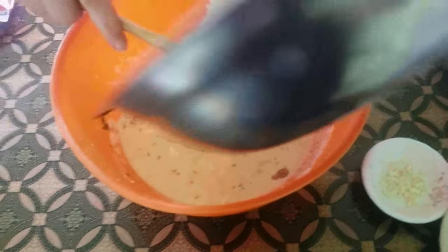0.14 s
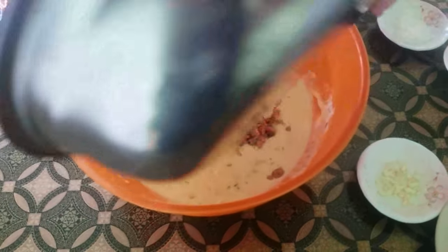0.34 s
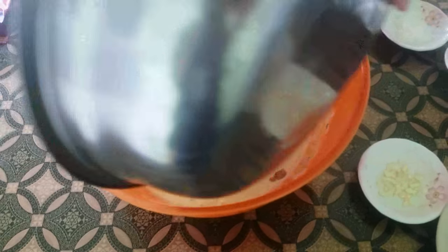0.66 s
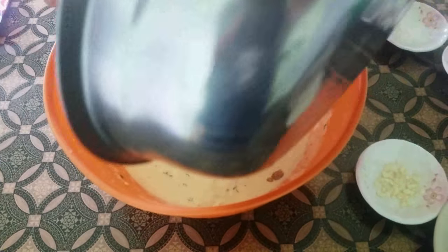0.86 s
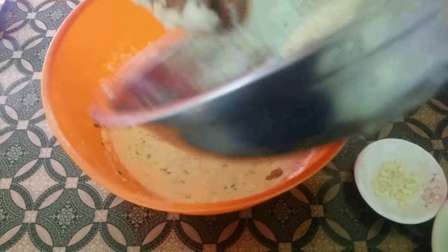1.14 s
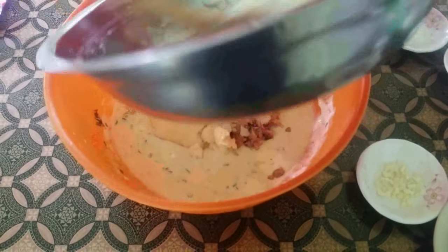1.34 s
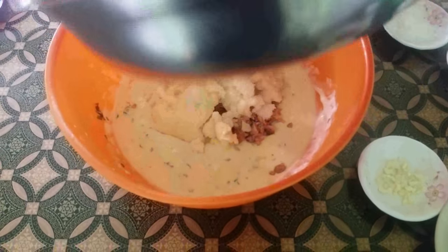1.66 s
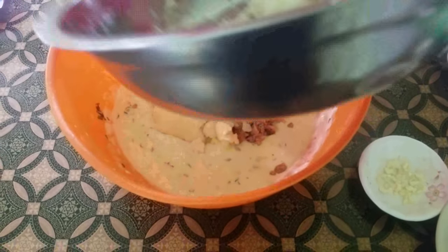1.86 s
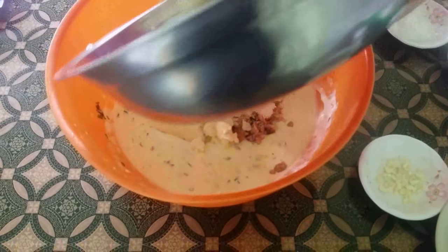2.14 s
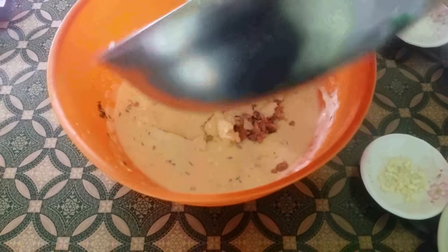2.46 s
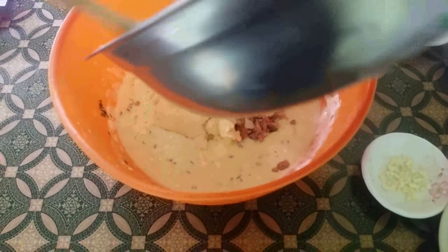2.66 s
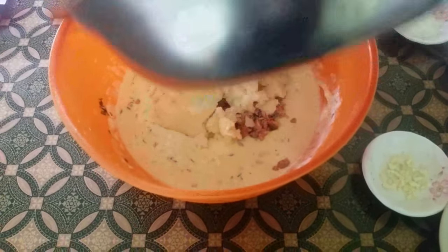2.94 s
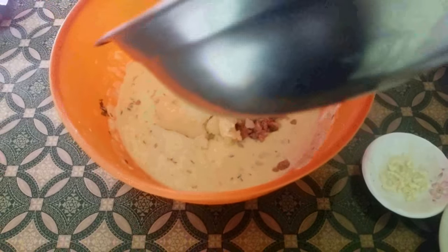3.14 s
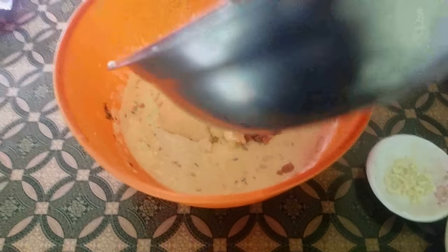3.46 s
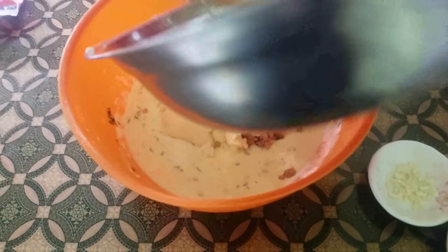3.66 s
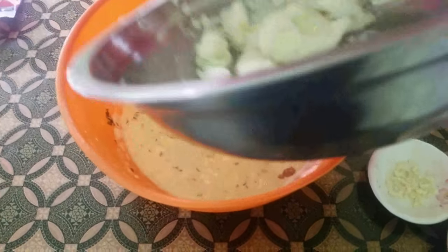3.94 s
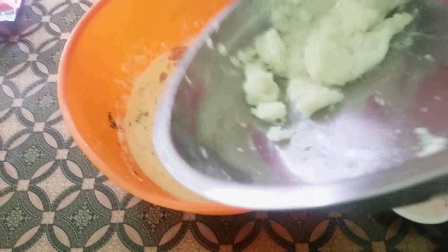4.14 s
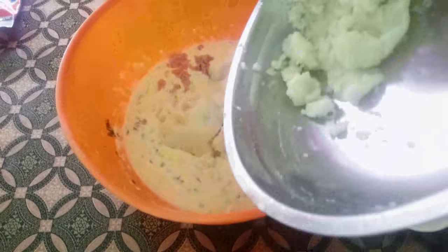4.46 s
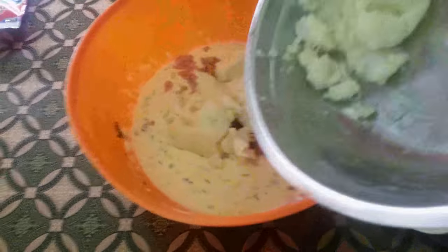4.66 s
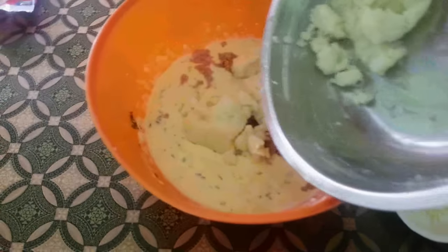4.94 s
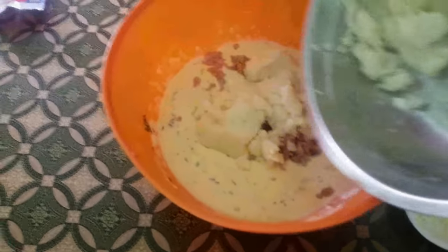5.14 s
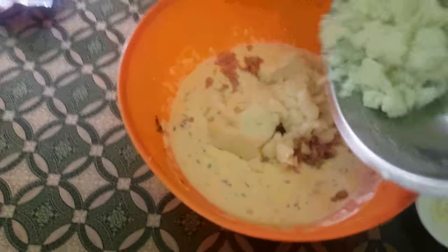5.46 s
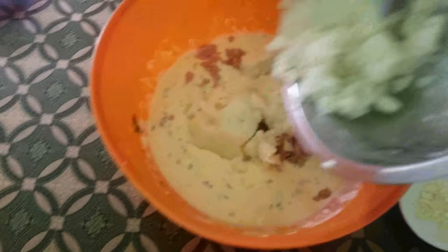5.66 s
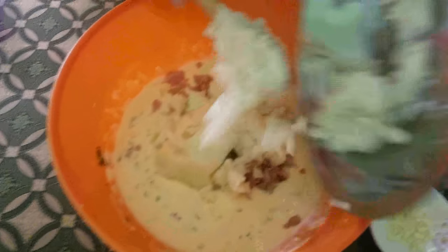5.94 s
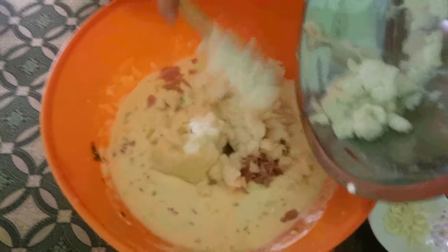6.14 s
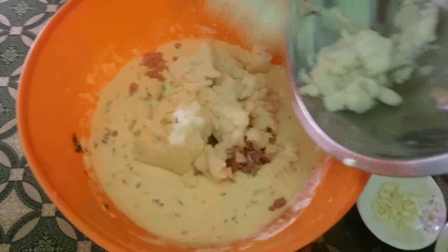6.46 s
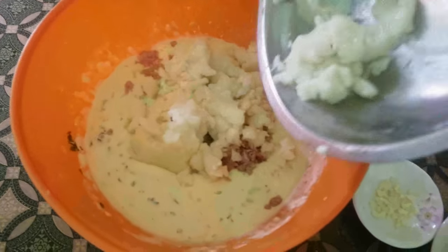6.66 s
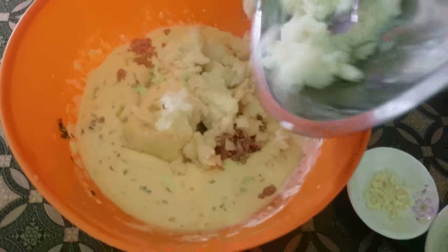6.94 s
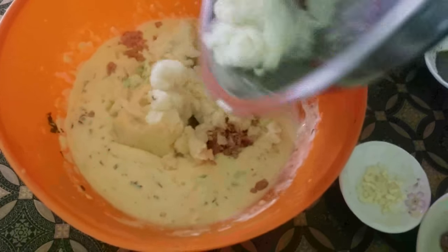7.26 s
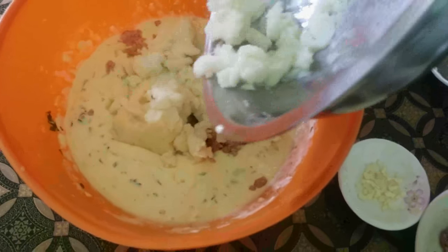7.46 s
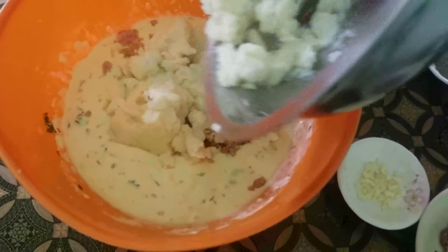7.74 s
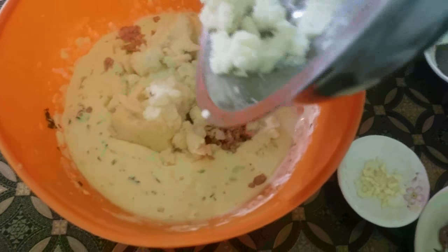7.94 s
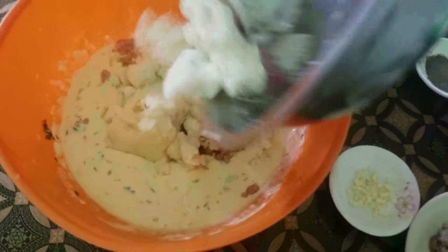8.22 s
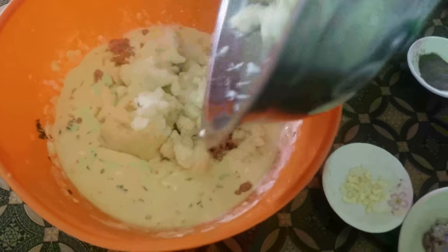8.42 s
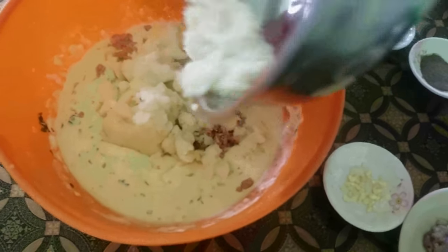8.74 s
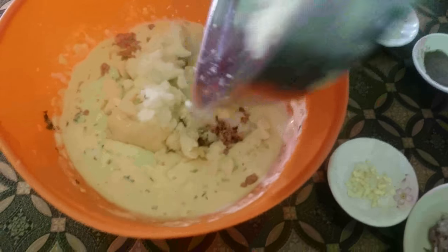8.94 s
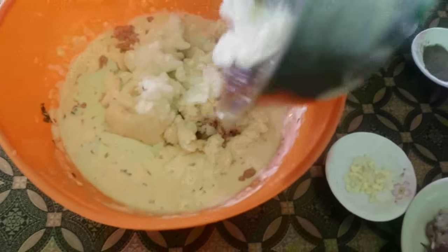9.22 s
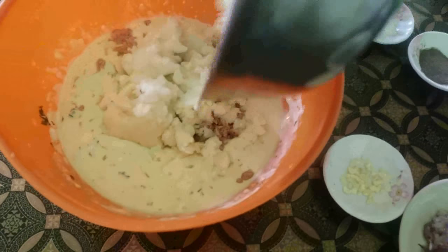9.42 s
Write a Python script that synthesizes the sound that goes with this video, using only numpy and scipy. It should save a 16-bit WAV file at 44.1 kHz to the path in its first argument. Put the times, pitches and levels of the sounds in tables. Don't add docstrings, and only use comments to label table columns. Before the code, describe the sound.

In a hard-walled kitchen, a low steady refrigerator hum, soft street rumble and hiss lie under a faint, distant clock ticking once a second. Close up, light wooden rubbing and moist food hiss begin. A moderate dull knock on a damped steel pan comes at 0.7 s, then louder ones at 1.4 and 1.7, a softer crackly one at 2.6. Brief scrapes and a bright skate run around 2.7-2.8, and a lump thuds softly into a plastic bowl at 3.1. A strong knock with a small rattle lands at 3.4, scraping and sticky flecks at 3.75, another firm knock at 4.05. From 4.4 to 6.5 there is mostly quiet smearing, tiny ticks and a soft thump at 5.2. Loud knocks ring at 6.7 and, loudest, 7.1, each with short room echo. A medium knock at 8.0, faint touches at 8.5 and 9.2, then hum and hiss.

```python
import sys
import numpy as np
from scipy import signal
from scipy.io import wavfile
from scipy.ndimage import uniform_filter1d

SR = 44100
rng = np.random.default_rng(int(sys.argv[2]) if len(sys.argv) > 2 else 0)


def nominal_scale(level):
    x = np.asarray(level, float) / 20
    return 10 ** x


def generate_wav(signal):
    frames = np.transpose(np.atleast_2d(signal))
    scaled = np.clip(frames, -1, 1) * 32767
    pcm = np.round(scaled).astype(np.int16)
    wavfile.write(sys.argv[1], SR, pcm)


N = 422756
TIME = np.arange(N) / SR

# pitch_hz [Hz], level_db [dB], t60_s [s]
BASE_FULL = [(163, -25, 0.058), (303, -3, 0.031), (345, -6.5, 0.083), (660, 10, 0.02), (763, 1.5, 0.027),
             (900, -6, 0.022), (1024, -9.5, 0.024), (1350, 7, 0.015), (1425, -5.5, 0.12),
             (483, -14.5, 0.13), (638, -17, 0.12), (2260, -40, .015)]
BASE_EDGE = [(277, -1.5, 0.014), (317, -0.5, 0.06), (344.3, -4, 0.15), (2500, -30, .06),
             (1020, -6.5, 0.026), (465, -7, 0.084), (650, 8, 0.035), (980, -9.5, 0.055), (1274, -1, 0.024),
             (2500, -20, 0.02)]
SIDE_LOW = [(231, -15, 0.052), (463, 6, 0.015), (620, 9.5, 0.026), (1005, -10, 0.059), (1300, -7, 0.058),
            (1420, -5.5, 0.09), (457.5, -9.5, 0.1), (704, -14.5, 0.19), (1930, -30, .012),
            (2240, -8, 0.026), (2660, -7, 0.019)]
SIDE_MIDDLE = [(228, 5, 0.02), (315, -4, 0.037), (430, 7, 0.014), (796, 6, 0.023), (1350, 7.5, 0.016),
               (815, -17.5, 0.22), (850, -18.5, 0.25), (1340, -12, 0.1), (461, -19.5, 0.17),
               (990, -13, .02), (1750, -14, 0.0071), (2100, -3, 0.012), (2530, -19, 0.018),
               (3000, -16, .006)]
SIDE_HIGH = [(239, -4, 0.11), (353, -10.5, 0.067), (415, -4, 0.031), (539, 7, 0.046), (549, -10, 0.38),
             (828, -12.5, 0.27), (1407, -13, 0.18), (1241, -14, 0.26), (691, -12.5, 0.24), (660, 5, 0.066),
             (770, 3, 0.12), (1250, 4, 0.03), (1310, 4.5, 0.025), (1770, -23, 0.013), (2400, -17, 0.013)]
NEAR_HAND = [(146, 6.5, 0.03), (338, 7, 0.017), (507, -5, 0.053), (715, -3.5, 0.035), (1350, 2.5, 0.017),
             (2500, -6, 0.022)]
UNDER_FOOD = [(117, 2.5, 0.029), (433, -5.5, 0.025), (746, 6.5, 0.011), (967, -4.5, 0.03),
              (1296, -4, 0.084), (1434, -2.5, 0.078)]
LIP = [(543, 17, 0.017), (816, 4.5, 0.019), (1266, -0.5, 0.041), (1550, -6, 0.063), (2510, 7, 0.011)]
BELOW_LIP = [(299, 7, 0.038), (600, 4.5, 0.033), (800, -9, 0.017), (1400, -1, 0.077), (1740, 0, 0.045),
             (2550, -14, 0.038), (3150, -18, .015)]
SPOTS = [BASE_FULL, BASE_EDGE, SIDE_LOW, SIDE_MIDDLE, SIDE_HIGH, NEAR_HAND, UNDER_FOOD, LIP, BELOW_LIP]
# echo_db [dB], hiss_db [dB]
SPOT_FEEL = [(-1.5, -6.5), (-1.1, 3), (0.5, -3), (1, -1.5), (-1.5, 0.5), (2.5, -.1), (1.7, 1), (-0.3, 7),
             (2.6, 8)]
# start_s [s], peak_db [dB], left_right_db [dB], crack_db [dB]
KNOCKS = [(0.738, -24.5, 5, -13.5), (1.362, -9.5, 3.5, -14.5), (1.707, -10, 2.5, -13.5),
          (2.097, -43.5, 5, -23), (2.616, -21.5, 5, -4), (3.426, -7.5, 2.5, -15), (3.478, -22.5, 3, -34),
          (3.487, -21, -4, -32), (3.509, -21, 1, -31), (3.528, -34, -2, -22), (3.733, -32, 0, -10),
          (3.78, -24.5, 1, -9.5), (3.811, -29.5, 3, -27), (3.919, -44, 0.0, -19), (4.055, -8.5, 6, -17.5),
          (4.596, -51.5, 5, 11.5), (4.984, -39.5, 6, 1), (5.008, -39, 3.5, -4), (6.742, -8, 4, -9),
          (7.129, -4.5, 4.5, -8.5), (7.136, -9.5, 0, -13), (7.966, -20, 9, -18), (8.017, -37, 1.5, -20),
          (8.137, -45, 10, -20), (8.529, -39, 12, -27), (9.216, -42.5, 11, -26)]
SPOT_OF_KNOCK = [6, 0, 0, 7, 8, 1, 1, 1, 1, 1, 2, 7, 7, 0, 2, 7, 7, 7, 3, 4, 4, 5, 4, 4, 5, 2]
PUSHED_OUTWARD = [1, 2, 4, 5]
# start_s [s], peak_db [dB], pitch_hz [Hz], t60_s [s]
DABS = [(.135, -46, 630, 0.035), (.2, -43, 620, 0.047), (.25, -44, 600, 0.046), (2.469, -41, 3150, .03),
        (.92, -45, 343, 0.066), (3.475, -20.5, 331, .1), (3.509, -25, 309.6, 0.12), (3.495, -22, 475, .06),
        (8.137, -38, 503, .04), (9.215, -39, 323, .12), (3.918, -49, 613, 0.036), (2.697, -38, 1270, .04),
        (2.713, -51, 2400, .05), (2.736, -34, 770, .04), (2.748, -35, 650, .05), (2.75, -48, 1400, 0.081),
        (2.748, -38, 2400, .02), (2.781, -34.5, 1303, 0.073), (2.8, -37, 2030, 0.033),
        (2.825, -39, 620, 0.072), (3.068, -53, 1420, .07), (3.125, -50, 1350, .05), (3.138, -51, 1260, .04),
        (3.152, -42.5, 560, 0.056), (3.155, -46, 840, .04), (3.187, -45, 606, 0.043),
        (3.178, -53, 1800, .03), (3.738, -30.5, 300, .05), (3.75, -39, 1296, .03), (3.75, -45, 2010, .03),
        (3.79, -49, 3270, .03), (3.82, -33, 295, .07), (3.842, -43, 280, 0.038), (4.598, -39, 1180, 0.032),
        (4.598, -40, 850, 0.028), (4.641, -44, 1000, .02), (4.984, -42.5, 1550, 0.039),
        (5.008, -38, 700, .03), (8.005, -48, 800, .07), (8.16, -46, 560, 0.14), (8.5, -52, 1350, .05),
        (9.172, -54, 2550, 0.042), (9.186, -46, 1190, 0.046), (9.193, -42, 427, .05),
        (9.2, -42, 773, 0.073), (9.204, -48, 2570, .06), (9.251, -42, 465, 0.1), (9.282, -46, 477, .08)]
# start_s [s], peak_db [dB]
TAPS = [
    (1.932, -55),
    (2.217, -63),
    (5.9858, -59),
    (6.162, -57.5),
]
# pitch_hz [Hz], level_db [dB], t60_s [s]
RIM_MODES = [(2520, 3, 0.028), (3150, 2, 0.0087)]
# start_s [s], peak_db [dB]
NUDGES = [
    (2.449, -48),
    (2.838, -42),
    (4.357, -62),
    (4.43, -45),
    (4.64, -54),
]
# pitch_hz [Hz], level_db [dB], t60_s [s]
WALL_MODES = [(650, -1, 0.027), (1170, -16, 0.019), (1430, -16, 0.017)]
# start_s [s], peak_db [dB]
THUMPS = [
    (3.0755, -36.5),
    (5.224, -41.5),
    (8.53, -50),
]
# pitch_hz [Hz], level_db [dB], t60_s [s]
BOWL_MODES = [(110, 3, 0.026), (231, 0.5, 0.038)]
# middle_s [s], low_modes_db [dB], high_above_low_db [dB], fade_10db_s [s]
SCRAPES = [(0.04, -62, 1.5, 0.02), (0.13, -57, 10, 0), (0.2, -61.5, 6.5, 0.05), (1.935, -56, -2, 0),
           (2.72, -43, -4, -0.03), (2.765, -38.5, -3.5, 0.0325), (2.82, -44.5, 0, 0.0051),
           (2.9, -67, 3, 0.06), (3.165, -57, -3, 0), (3.755, -45.5, -4, 0), (3.8, -64, -4.5, 0.57),
           (4.49, -63.5, -1, 0.2), (5.2, -69, 3, 2), (7.62, -62, -4, 0), (8.51, -63, -1, 0.26),
           (9.21, -56.5, 4, 0.06), (3.83, -64, -12, -0.3)]
# pitch_hz [Hz], level_db [dB], t60_s [s]
DRAG_LOW = [(616, 1, 0.047), (789, 0, 0.08), (1038, 4, 0.022), (1270, -0.5, 0.023), (1423, 3, 0.041)]
# pitch_hz [Hz], level_db [dB], t60_s [s]
DRAG_HIGH = [(1790, 7, 0.0085), (2290, 5, 0.01), (2440, 11.5, 0.0096), (3100, 0.5, 0.008),
             (1590, 1, 0.0087), (2030, 2, 0.004), (2820, 0.5, 0.0047), (3700, -11, 0.0043)]
# peak_s [s], level_db [dB], spare_db [dB], fade_10db_s [s]
SHEEN = [
    (2.76, -66, 0.0, -0.34),
    (2.8, -46, 0.0, 0.0651),
]
# pitch_hz [Hz], level_db [dB], t60_s [s]
SHEEN_MODES = [(11300, -2, 0.00084), (7600, -3, 0.0014)]
# peak_s [s], fine_db [dB], coarse_above_fine_db [dB], fade_10db_s [s]
SMEARS = [(0.03, -70.5, 7.5, 0.18), (0.24, -61, 0.5, 0.26), (0.51, -63.5, 3, 0.1), (0.64, -64.5, 0.5, 0.07),
          (1.48, -80, 13.5, -0.3), (1.7, -74.5, 6.5, 0.35), (1.94, -59.5, 2.5, 0.07), (2.29, -75, 9, 0.14),
          (2.622, -62, 10, 0.03), (2.64, -70, 15, 0.01), (2.73, -71, 5, 0.1), (2.8, -54, 2, 0.1439),
          (3.23, -63.5, .5, 0.12), (3.46, -76, 13, -0.57), (3.55, -65, 4, 0), (3.79, -47.5, 6, -0.0066),
          (3.815, -55.5, 4.5, 0.09), (4.19, -69.5, -0.5, 1.1), (4.42, -56.5, -3, 0.15),
          (4.52, -62, 7.5, 0.03), (4.74, -68.5, 1.5, 0.08), (4.86, -70, -4, 0.1), (5.01, -62, 0, -0.03),
          (5.17, -60, -2.5, 0.15), (5.36, -66, -4, 0.25), (5.53, -61.5, 0, 0.23), (5.7, -62, 3, -0.2),
          (5.98, -63.5, 1.5, 0.26), (6.35, -69.5, -1, 0.2), (6.77, -73.5, 4, -0.3), (6.84, -59, 2, -0.05),
          (6.99, -60, -1, 0.14), (7.17, -65.5, 15, -0.08), (7.25, -57, -0.5, 0.06), (7.34, -65, -4, 0.13),
          (7.7, -63, 0.5, 0.15), (8.3, -65, 0, 0.26), (8.87, -73.5, 2.5, 0.9), (9.22, -65, 0, -0.06),
          (9.5, -77, 10, -0.5)]
# pitch_hz [Hz], density_db [dB per Hz]
FINE = [(5000, -38), (8500, -30.5), (10600, -35), (11700, 3), (13200, 12), (15100, -4), (15700, -8)]
# pitch_hz [Hz], density_db [dB per Hz]
COARSE = [(1760, -29), (3000, 5), (4540, -7), (5450, 2.5), (6380, -17.5), (7420, -1), (9000, -8),
          (11700, -43), (19800, -120)]
# start_s [s], peak_db [dB], pitch_hz [Hz], length_s [s]
FLECKS = [(.469, -57, 5800, 0.0068), (0.463, -49, 3100, 0.0066), (.931, -60, 7600, .006),
          (0.962, -61, 7300, .006), (1.072, -63, 7700, .005), (2.276, -53, 7100, 0.0067),
          (2.468, -55, 5730, .01), (2.471, -62, 10800, .004), (3.746, -49, 6600, 0.0037),
          (3.751, -42.5, 6740, 0.0059), (3.749, -48, 12450, .005), (3.768, -41, 6800, 0.0075),
          (3.779, -41, 7340, 0.013), (3.918, -48, 7650, 0.0055), (3.985, -53, 7300, 0.0072),
          (3.986, -54, 10300, .005), (4.455, -43, 14800, 0.0051), (4.498, -53, 7400, 0.0047),
          (4.708, -53, 14800, .008), (4.955, -51, 13500, .006), (6.36, -51.5, 12500, .006),
          (7.129, -38, 7140, .008), (7.166, -38.5, 5370, 0.0095), (7.654, -58, 6500, .006),
          (7.702, -51, 13500, 0.0042), (7.703, -55, 7000, .006), (7.789, -52, 14000, .006),
          (9.214, -58, 6500, 0.0094), (9.452, -60, 5800, 0.02), (3.532, -44, 3820, 0.0057),
          (3.04, -62, 9000, .003), (4.428, -50, 3000, .003), (4.42, -46, 6500, .003),
          (4.454, -45, 8000, 0.0033), (4.392, -53, 10500, .003), (1.929, -52, 2900, .003)]
# pitch_hz [Hz], t60_s [s], level_db [dB]
KITCHEN = [(60, 0.73, -27), (258, 0.34, 4.5), (610, 0.51, -2), (900, 0.51, 1), (1380, 0.44, 2.5),
           (2280, 0.52, 4), (3470, 0.45, 4.5), (5440, 0.59, 1.5), (8300, 0.05, -8)]
# pitch_hz [Hz], likeness [0 to 1]
LIKENESS = [(30, .7), (60, 0.85), (150, 0.76), (380, 0.93), (950, 0.19), (2380, 0.024), (5980, 0.017),
            (15000, 0.03)]
# pitch_hz [Hz], left_right_db [dB]
LEAN = [(60, -0.5), (150, 4.5), (380, 1), (950, 1), (2380, -2.5), (5000, -7), (8500, 3.5), (12000, 3),
        (15000, -3)]
# start_s [s], level_db [dB]
TICKS = [(.44, -68.5), (1.439, -60.5), (2.441, -69), (3.442, -63.5), (4.441, -69), (5.44, -63), (6.44, -71),
         (7.442, -64), (8.45, -71), (9.439, -64.5)]
# delay_s [s], level_db [dB]
TICK_STEPS = [
    (-.012, -6),
    (.008, 0),
    (.027, -1.5),
    (.085, -12),
]
# pitch_hz [Hz], level_db [dB], t60_s [s]
CLOCK_MODES = [(1120, -2, 0.0087), (1590, -2, 0.0037), (2400, -7, 0.0094), (2950, -1, 0.0039),
               (3330, 1.5, 0.0061), (3600, -7, 0.0024), (1950, -6, 0.0028), (5730, -3, 0.0033)]
# multiple [of motor speed], level_db [dB], left_right_db [dB]
HUM = [(1, -18.5, -2.5), (2, -20, -5.5), (3, -8, 0.5), (4, -20, -2.5), (5, -0.5, 4), (6, -21, -6.5),
       (7, -26.5, 11), (30, -38.5, 13.5)]
# time_s [s], strongest_hum_line_db [dB]
BACKGROUND_SWAY = [(0.0, -43), (0.96, -46.5), (1.41, -43), (1.87, -45.5), (2.48, -43.5), (3.01, -46.5), (3.58, -43.5),
                   (4.3, -45.5), (4.91, -43.5), (5.23, -44.5), (6.06, -43.5), (6.49, -45), (7.1, -43.5),
                   (7.32, -46.5), (7.93, -43.5), (8.22, -45), (9.05, -44.5), (9.59, -45)]
# pitch_hz [Hz], density_db [dB per Hz]
RUMBLE = [(25, -26), (42, 7.5), (60, 0), (95, -4.5), (130, -4), (170, -6), (230, -11.5), (330, -14)]
# pitch_hz [Hz], density_db [dB per Hz]
FLOOR = [(360, 2.5), (715, 4.5), (830, -3), (1160, -1.5), (1450, -4.5), (1700, -5.5), (2100, -12),
         (2500, 5), (2850, -10), (3400, -7.5), (4500, -17.5), (5100, -15), (7350, -39.5), (8500, -65.5)]

SMEAR_RISE = 0.67
REST_FINE_DB, REST_COARSE_DB = -76.5, -92


def knocks():
    echo_db, crack_lean_db = -5.5, -10.5
    shiver_db, shiver_s = -14.5, 0.018
    chatter_depth, chatter_hz, settle_s = 0.63, 122, 0.033
    out, send, t = np.zeros((2, N + SR)), np.zeros(N + SR), np.arange(SR // 4) / SR
    dull = signal.butter(3, [250, 2600], "band", fs=SR, output="sos")
    wide = signal.butter(2, [400, 4200], "band", fs=SR, output="sos")
    slow = signal.butter(4, chatter_hz, fs=SR, output="sos")
    no_deep_bass = signal.butter(2, 85, "high", fs=SR, output="sos")
    contact = np.exp(-t / 0.0002) * (1 - np.exp(-t / 0.000067))
    resting = 1 - np.exp(-t / settle_s)
    for k, ((start_s, peak_db, left_right_db, crack_db), spot) in enumerate(zip(KNOCKS, SPOT_OF_KNOCK)):
        spot_echo_db, spot_hiss_db = SPOT_FEEL[spot]
        sign = 1 if k in PUSHED_OUTWARD else -1
        blow = sign * ring(contact, SPOTS[spot]) * (1 - np.exp(-t / 0.00096))
        blow = signal.sosfilt(no_deep_bass, blow)

        shared, own = rng.standard_normal(len(t)), rng.standard_normal((2, len(t)))
        burst = (shared + 1.53 * own) * np.exp(-t / 0.0034) * (1 - np.exp(-t / 0.00061))
        shiver = own[:, ::-1] * np.exp(-t / shiver_s) * (1 - np.exp(-t / 0.012))
        shiver = nominal_scale(shiver_db + spot_hiss_db) * shiver
        crack = signal.sosfilt(dull, burst) + signal.sosfilt(wide, shiver)
        crack = crack + nominal_scale(-48.5) * np.diff(burst, prepend=0)
        sound = blow / np.abs(blow).max() + nominal_scale(crack_db) * lean(crack_lean_db) * crack
        sound = nominal_scale(peak_db) * sound

        chatter = 1 + chatter_depth * rms_one(signal.sosfilt(slow, shared[::-1]))
        chatter = chatter / np.hypot(1, chatter_depth)
        sound = sound * (1 + (chatter - 1) * resting)
        at = round((start_s + .0006) * SR)
        out[:, at:][:, :len(t)] += sound * lean(left_right_db)
        blurred = sound.mean(axis=0) * chatter * np.exp(-t / settle_s)
        send[at:][:len(t)] += nominal_scale(echo_db + spot_echo_db) * blurred
    return out[:, :N], send[:N]


def dabs():
    out, t = np.zeros(N + SR), np.arange(SR // 5) / SR
    for start_s, peak_db, pitch_hz, t60_s in DABS:
        decay = nominal_scale(peak_db - 60 * t / max(t60_s, .005))
        swell = 1 - np.exp(-t / 0.0012)
        out[round(start_s * SR):][:len(t)] += decay * swell * np.sin(2 * np.pi * pitch_hz * t)
    return out[:N]


def taps(events, modes):
    clicks = np.zeros(N)
    clicks[[round(start_s * SR) for start_s, peak_db in events]] = nominal_scale(np.array(events)[:, 1] + 3.0)
    return ring(clicks, modes)


def drag():
    slips_per_s = 1100 * nominal_scale(3 * drift(60))
    slips = rng.random((3, N)) < slips_per_s / SR
    slips = slips * nominal_scale(1.7 * np.minimum(rng.exponential(1, (3, N)), 4))
    slips = slips * rng.choice([-1, 1], (3, N))
    low, high = swells(SCRAPES, 0.86, 1.27)
    body = rms_one(ring(slips[0] + .5 * slips[1:], DRAG_LOW)) * low
    return body + rms_one(ring(slips[1:], DRAG_HIGH)) * high * nominal_scale([[-3], [2.5]])


def sheen():
    return rms_one(ring(rng.standard_normal((2, N)), SHEEN_MODES)) * swells(SHEEN, 1.25, 1.6)[0]


def smear():
    wash_db, wash_rise_s, wash_t60_s = -36.5, 0.021, 0.76
    wash = []
    for (start_s, peak_db, left_right_db, crack_db), spot in zip(KNOCKS, SPOT_OF_KNOCK):
        coarse_db = peak_db + crack_db + wash_db + SPOT_FEEL[spot][1] - 1
        wash.append((start_s + wash_rise_s, coarse_db - 60, 60, wash_t60_s / 6))
    level = np.hypot(swells(SMEARS, SMEAR_RISE), swells(wash, wash_rise_s / wash_t60_s))
    level = np.hypot(level, nominal_scale([[REST_FINE_DB], [REST_COARSE_DB]]))
    level = level * nominal_scale(1.6 * drift(34))
    fine = rms_one(bands(N, 8100, 16260, lambda hz: at_hz(FINE, hz)))
    coarse = rms_one(bands(N, 2956, 8224, lambda hz: at_hz(COARSE, hz)))
    return level[0] * fine + level[1] * coarse


def flecks():
    width = 0.17
    out, t = np.zeros((2, N + SR)), np.arange(2000) / SR
    for start_s, peak_db, pitch_hz, length_s in FLECKS:
        noise = rng.standard_normal((3, len(t)))
        edges = [pitch_hz * (1 - width / 2), min(pitch_hz * (1 + width / 2), 15700)]
        band = signal.butter(2, edges, "band", fs=SR, output="sos")
        puff = rms_one(signal.sosfilt(band, noise[0] + 1.2 * noise[1:]))
        puff = puff * np.exp(-t / max(length_s, .001)) * (1 - np.exp(-t / 0.00065))
        out[:, round(start_s * SR):][:, :len(t)] += nominal_scale(peak_db - 5.0) * puff * lean(-2)
    return out[:, :N]


def kitchen(x):
    t = np.arange(SR) / SR
    echoes = bands(len(t), 50, 16000, lambda hz: at_hz(KITCHEN, hz, column=2) - 60 * t / at_hz(KITCHEN, hz))
    echoes = echoes * np.clip((t - .006) / .008, 0, 1)
    echoes = echoes * (1 + 2.3 * np.exp(-t / 0.0088))
    echoes = echoes / np.sqrt(np.sum(echoes ** 2) / 2)
    return signal.fftconvolve(x[None], echoes, axes=1)[:, :N]


def clock():
    clicks, n = np.zeros(N + SR), np.arange(900)
    rattle = np.exp(-n / 260) * (1 - np.exp(-n / 40))
    for start_s, level_db in TICKS:
        for delay_s, step_db in TICK_STEPS:
            at = round((start_s + delay_s) * SR)
            clicks[at:at + len(n)] += nominal_scale(level_db + step_db - 3.5) * rattle * rng.standard_normal(len(n))
    return ring(clicks[:N], CLOCK_MODES)


def refrigerator():
    motor_hz, lag_s = 49.07, .00007
    out, heard_s = 0, TIME - lag_s * np.array([[1], [0]])
    for multiple, level_db, left_right_db in HUM:
        turns = round(multiple) * motor_hz * heard_s + rng.random() + 0.033 * drift(6.0)
        tone = np.sqrt(2) * np.sin(2 * np.pi * turns)
        out = out + nominal_scale(level_db + 0.21 * drift(9)) * lean(left_right_db) * tone
    return nominal_scale(in_time(BACKGROUND_SWAY) + 0.22) * out


def air():
    rustle_follows, rustle_from_hz = 0.22, 410
    sway_db = in_time(BACKGROUND_SWAY) - in_time(BACKGROUND_SWAY).mean()
    busy = np.hypot(swells(SMEARS, SMEAR_RISE)[0] / nominal_scale(REST_FINE_DB), 1)
    busy_db = 20 * np.log10(uniform_filter1d(busy, size=8000))
    busy_db = rustle_follows * (busy_db - busy_db.mean())

    def hiss_db(hz):
        rustle_db = busy_db * np.clip(np.log2(hz / rustle_from_hz) / 2, 0, 1)
        return at_hz(FLOOR, hz) + 1.0 * drift(6.8) + rustle_db

    rumble = rms_one(bands(N, 25.5, 348.0, lambda hz: at_hz(RUMBLE, hz) + 2.0 * drift(4.4)))
    hiss = rms_one(bands(N, 334.4, 8650, hiss_db))
    return nominal_scale(-51.5 + 0.4 * sway_db) * rumble + nominal_scale(-59 + 0.37 * sway_db) * hiss


def ring(clicks, modes):
    out = 0
    for pitch_hz, level_db, t60_s in modes:
        r, w = nominal_scale(-60 / (t60_s * SR)), 2 * np.pi * pitch_hz / SR
        resonator = [1, -2 * r * np.cos(w), r * r]
        out = out + signal.lfilter([0, nominal_scale(level_db) * np.sin(w)], resonator, clicks + 1e-18)
    return out


def swells(strokes, rise, power=1):
    peak_s, level_db, above_db, fade_s = np.transpose(strokes)[:, :, None]
    coarse_time = TIME[::64]
    late_s = coarse_time - peak_s
    distance = np.maximum(late_s, -late_s / rise) / np.maximum(fade_s, .005)
    shape_db = level_db - 10 * distance ** power
    gains = [np.sqrt(np.sum(nominal_scale(2 * layer_db), axis=0)) for layer_db in (shape_db, shape_db + above_db)]
    return np.array([np.interp(TIME, coarse_time, gain) for gain in gains])


def bands(size, low_hz, high_hz, gain_db):
    out, white = 0, rng.standard_normal((2, 2, size))
    edges = np.geomspace(low_hz, high_hz, round(2.7 * np.log2(high_hz / low_hz)) + 1)
    for k, (low, high) in enumerate(zip(edges, edges[1:])):
        band = signal.butter(2, [low, high], "band", fs=SR, output="sos")
        mid, side = signal.sosfilt(band, white[k % 2])
        hz = np.sqrt(low * high)
        alike = np.clip(at_hz(LIKENESS, hz), 0, 1)
        pair = np.sqrt(1 + alike) * mid + np.sqrt(1 - alike) * side * [[1], [-1]]
        out = out + nominal_scale(gain_db(hz)) * lean(at_hz(LEAN, hz)) * pair
    return out


def drift(rate_hz):
    r = np.exp(-80 * np.pi * rate_hz / SR)
    slow = signal.lfilter([1], [1, -2 * r, r * r], rng.standard_normal(N // 40 + 2002))[2000:]
    return np.interp(np.arange(N) / 40, np.arange(len(slow)), rms_one(slow))


def lean(left_right_db):
    return nominal_scale(left_right_db / 2 * np.array([[1], [-1]]))


def rms_one(x):
    return x / np.sqrt(np.mean(x ** 2) + 1e-20)


def at_hz(points, hz, column=1):
    table = np.array(points)
    return np.interp(np.log(hz), np.log(table[:, 0]), table[:, column])


def in_time(rows):
    return np.interp(TIME, *np.transpose(rows))


def scene():
    hits, send = knocks()
    light, rub = dabs(), drag()
    touch, ticks = taps(TAPS, RIM_MODES), clock()
    send = send + nominal_scale(-6) * light + nominal_scale(-5.5) * rub[0] + nominal_scale(6.5) * ticks + nominal_scale(-6.0) * touch
    pan = hits + light * lean(2) + rub + sheen() + taps(NUDGES, WALL_MODES)
    food = smear() + flecks() + taps(THUMPS, BOWL_MODES)
    aside = (ticks + touch) * nominal_scale([[-4], [2.5]])
    return pan + food + aside + kitchen(send) + refrigerator() + air()


def low_pass(x):
    return signal.sosfilt(signal.butter(12, 16610, fs=SR, output="sos"), x)


def record(dry):
    x = signal.sosfilt(signal.butter(2, 36, "high", fs=SR, output="sos"), dry)
    rounded = .8 * np.tanh(x / .8)
    mix = signal.sosfilt(signal.cheby2(20, 60, 16000, fs=SR, output="sos"), rounded)
    return low_pass(mix)


dry = scene()
out = record(dry)
generate_wav(out)
```